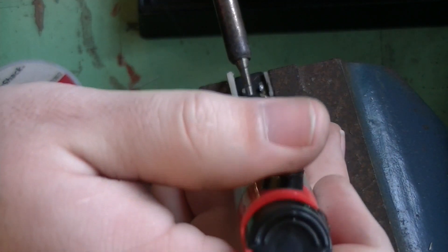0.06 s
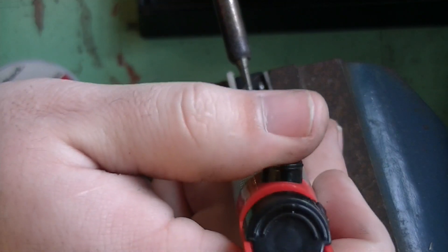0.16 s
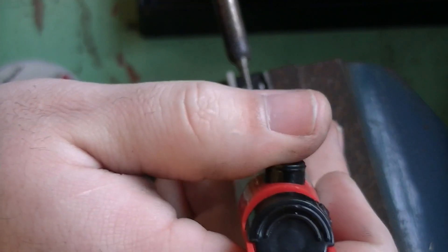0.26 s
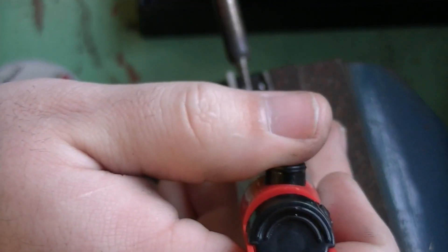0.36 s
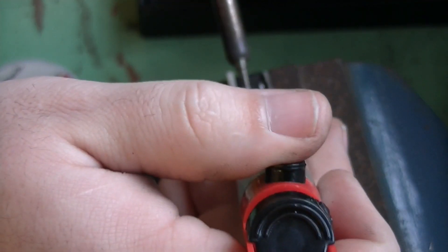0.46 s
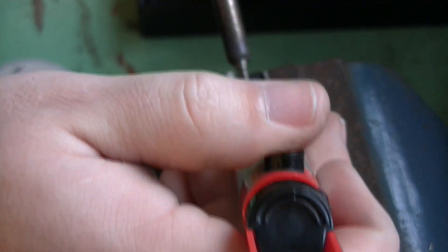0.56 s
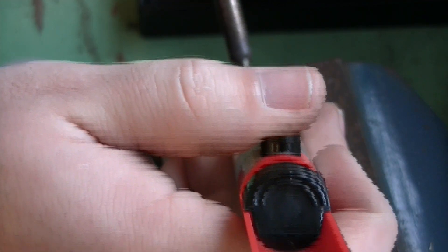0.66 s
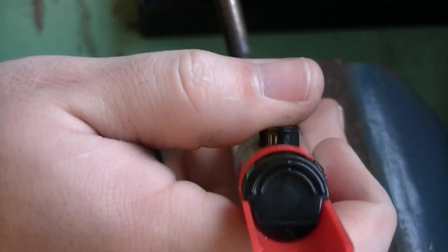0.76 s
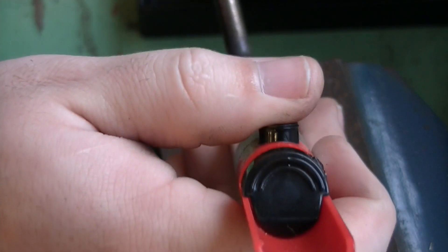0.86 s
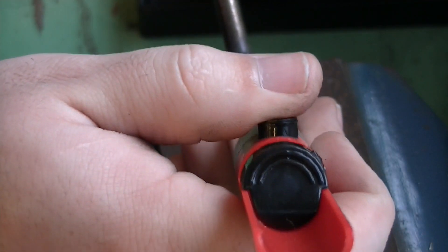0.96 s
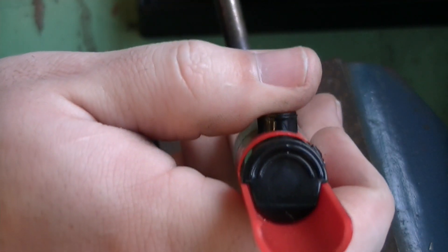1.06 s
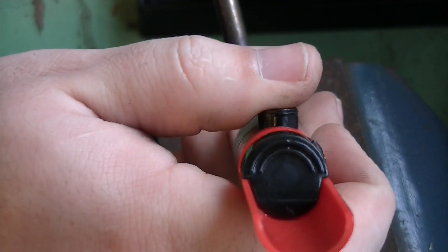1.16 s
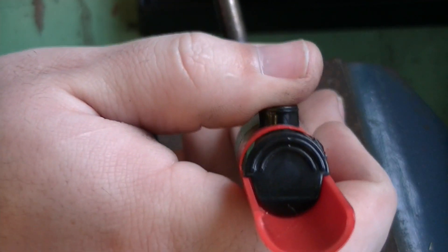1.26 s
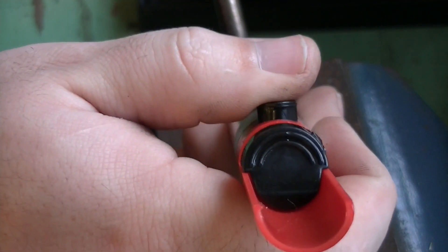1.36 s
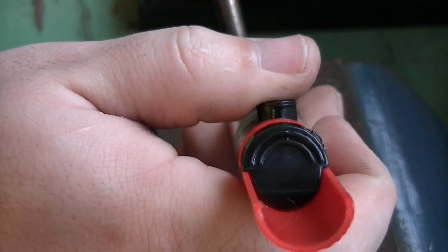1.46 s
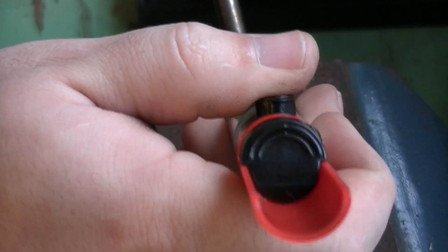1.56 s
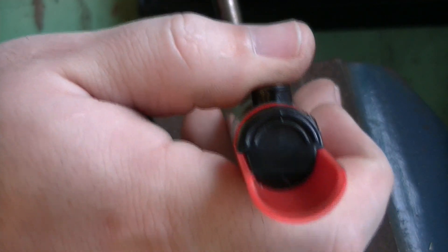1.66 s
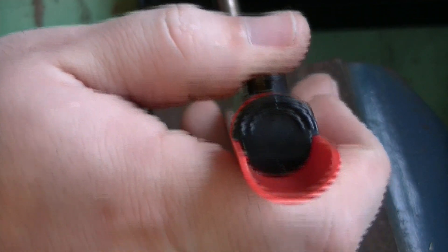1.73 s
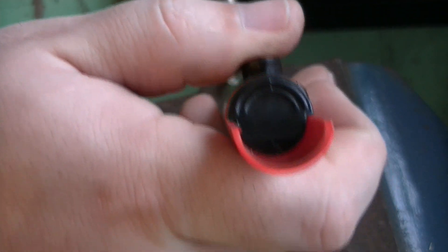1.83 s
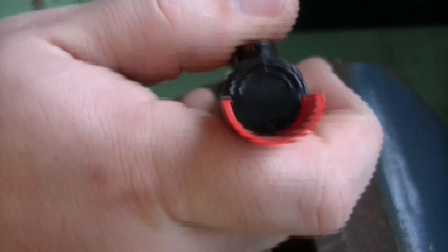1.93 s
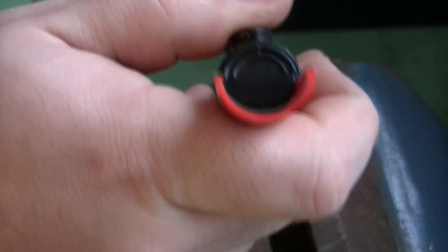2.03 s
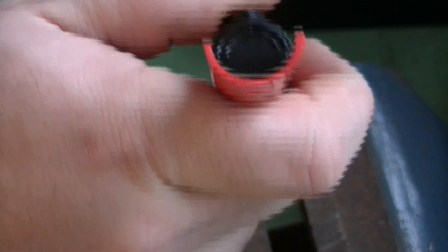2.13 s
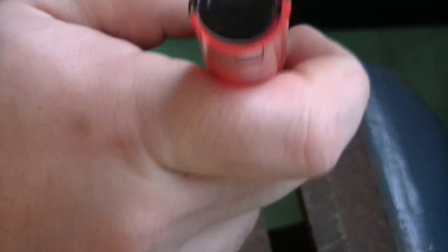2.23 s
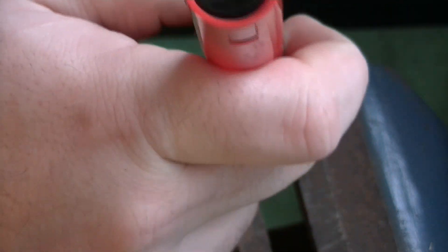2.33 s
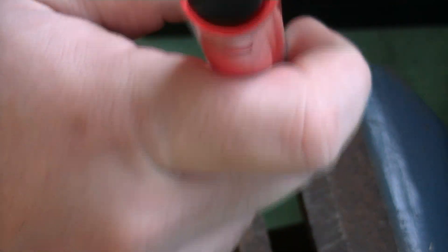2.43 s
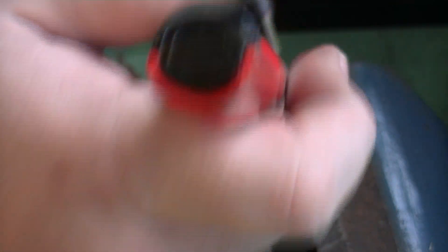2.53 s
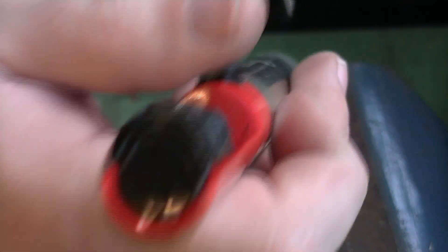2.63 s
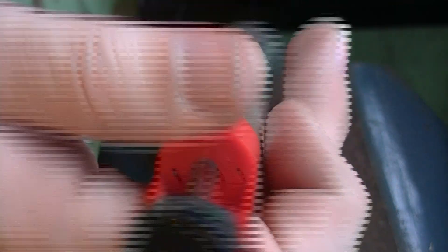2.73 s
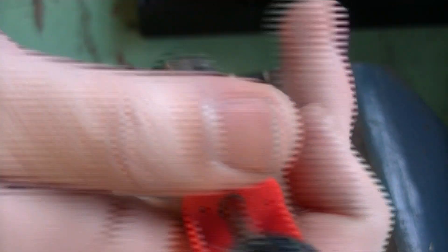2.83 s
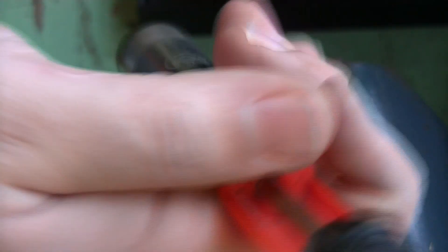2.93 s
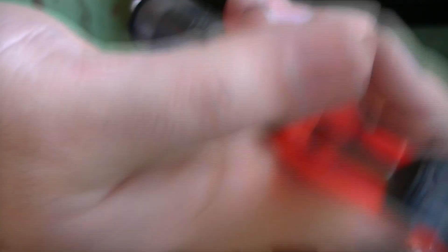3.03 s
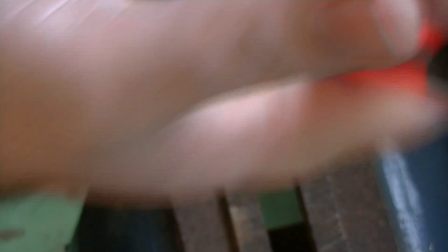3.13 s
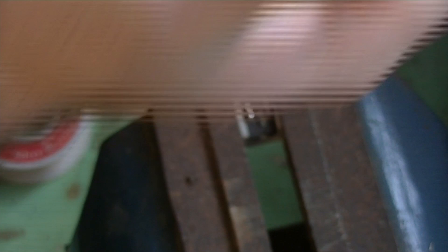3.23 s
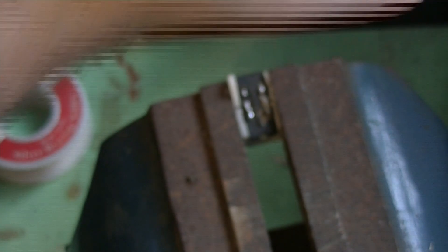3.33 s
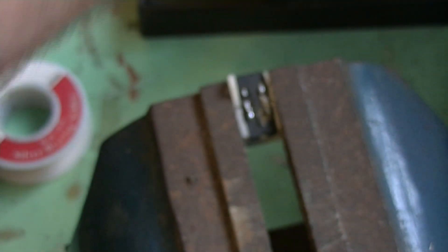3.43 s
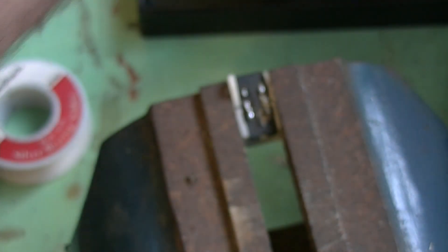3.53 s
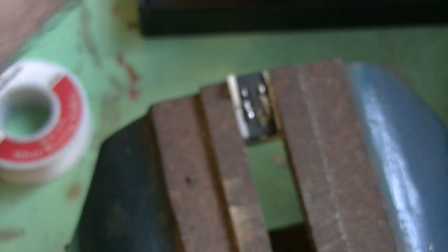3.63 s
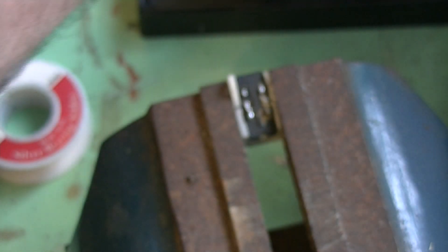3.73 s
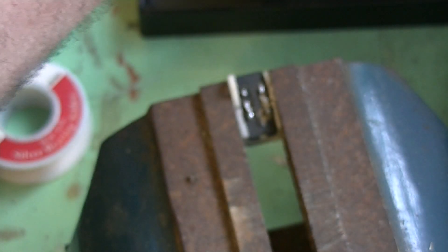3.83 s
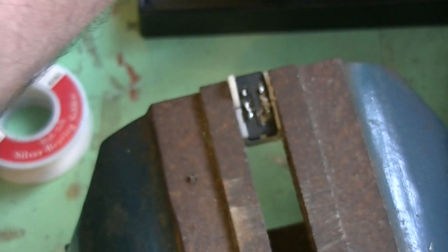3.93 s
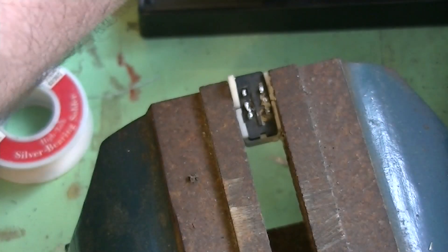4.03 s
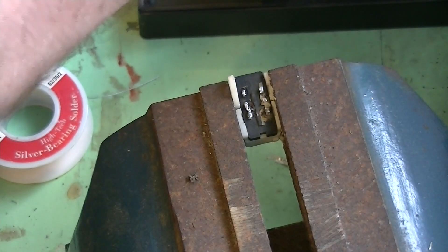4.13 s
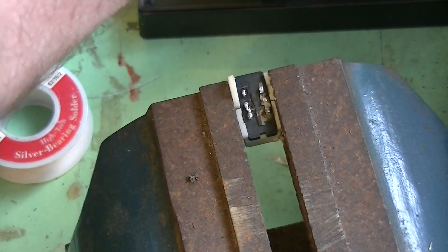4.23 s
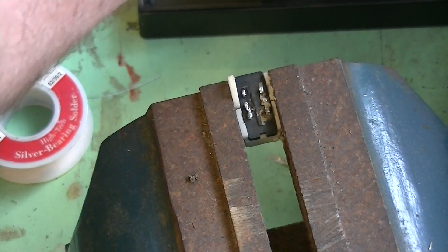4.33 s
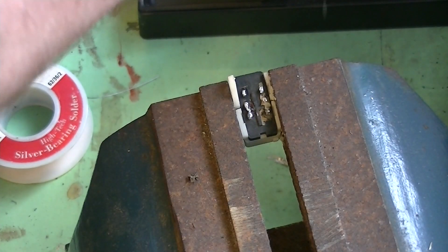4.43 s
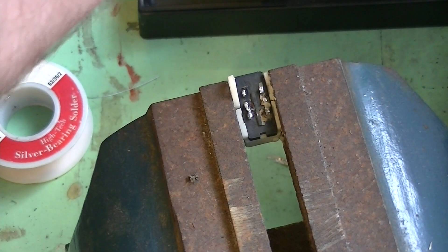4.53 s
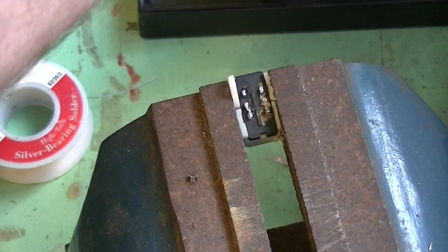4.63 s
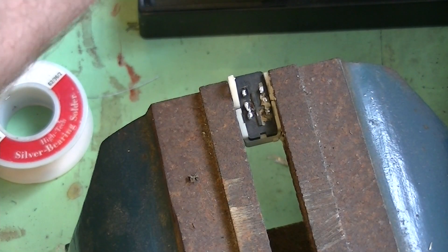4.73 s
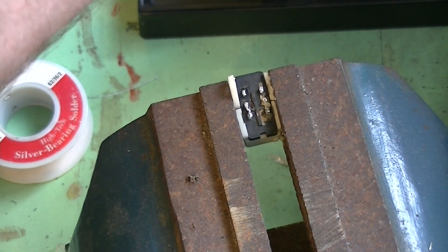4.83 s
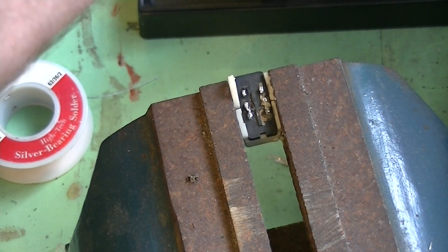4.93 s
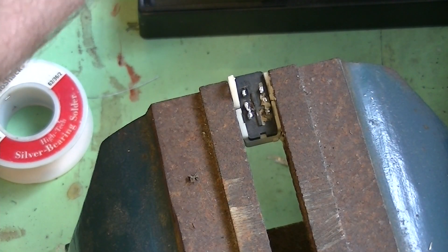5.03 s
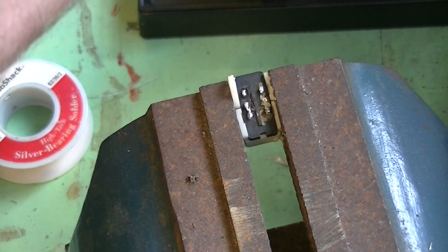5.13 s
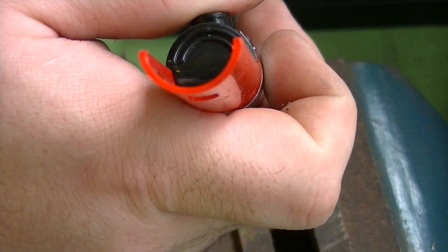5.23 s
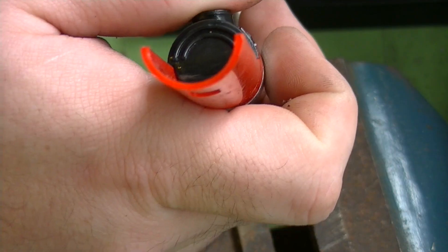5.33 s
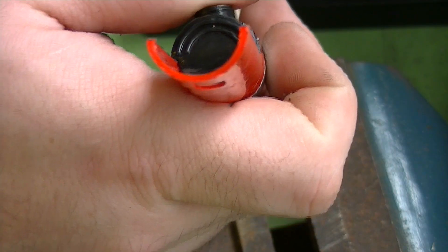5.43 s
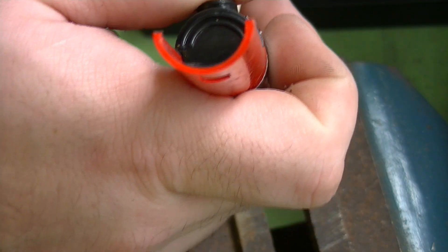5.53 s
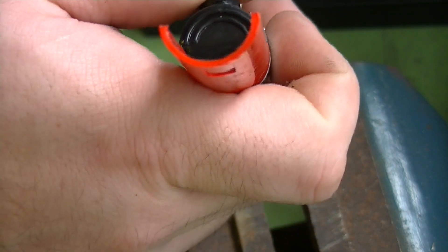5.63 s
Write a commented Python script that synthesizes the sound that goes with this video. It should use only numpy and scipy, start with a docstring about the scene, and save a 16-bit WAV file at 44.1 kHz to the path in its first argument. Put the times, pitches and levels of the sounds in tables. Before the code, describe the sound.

A low machine hum fills a small workshop, with an occasional faint squeak further off. About two seconds in, a spring-loaded solder sucker snaps sharply close to the microphone, leaving a brief rattle. Fingers slide softly on it, then it is pushed down until the latch clicks loudly. Its loose plunger is shaken up and down, each quick stroke a hissing rub ending in a knock that rings the plastic barrel and spring.

```python
"""A spring-loaded solder sucker snaps close by in a small workshop: rod and end cap ring, a rattle follows.
It is cocked again until its latch clicks, then its loose plunger is shaken up and down, the seal rubbing
and hissing and each stroke ending in a knock that rings the plastic barrel and the spring. Two machines
hum over the room noise, something further off squeaks now and then, and two thin whistles glide by."""
import sys
import numpy as np
from scipy import signal
from scipy.io import wavfile
from scipy.ndimage import uniform_filter1d

SR = 44100
rng = np.random.default_rng(int(sys.argv[2]) if len(sys.argv) > 2 else 0)


def generate_wav(signal):
    """Clip the signal to [-1, 1] and save it as 16-bit WAV at the path in sys.argv[1]."""
    frames = np.transpose(np.atleast_2d(signal))
    scaled = np.clip(frames, -1, 1) * 32767
    pcm = np.round(scaled).astype(np.int16)
    wavfile.write(sys.argv[1], SR, pcm)


N = 250929
TIME = np.arange(N) / SR


def amp(db):
    return 10 ** (np.asarray(db) / 20)


def unit_rms(x):
    return x / np.sqrt(np.mean(x ** 2) + 1e-20)


def curve_at(points, hz):
    f, value = np.transpose(points)
    return np.interp(np.log(hz + 1), np.log(f + 1), value)


def ringing(modes):
    """Impulse response of dying modes (f/Hz, level/dB, t60/s), energy 1."""
    t = np.arange(SR // 2) / SR
    ring = sum((-1) ** k * amp(db - 60 * t / t60) * np.sin(2 * np.pi * hz * t)
               for k, (hz, db, t60) in enumerate(modes))
    return ring / np.linalg.norm(ring)


def resonant(peaks):
    """Impulse response of peaks (f/Hz, width/Hz, level/dB): a wide one starts higher and dies fast."""
    return ringing([(hz, db + 20 * np.log10(width), np.log(1000) / np.pi / width)
                    for hz, width, db in peaks])


def excite(drive, ring):
    return signal.fftconvolve(drive, ring)[:N]


def noise(shape_db, size, likeness=lambda hz: 1):
    """Stereo noise coloured by shape_db(hz, t); a likeness of 1 makes left and right the same."""
    hz = np.fft.rfftfreq(size, 1 / SR)[:, None]
    t = np.arange(N * 4 // size + 5) * size / 4 / SR
    a, b, c, d = rng.standard_normal((len(t), len(hz), 4)).T
    like = np.clip(likeness(hz), 0, 1)
    left = a + 1j * b
    right = like * left + np.sqrt(1 - like ** 2) * (c + 1j * d)
    spectra = np.array([left, right]) * amp(shape_db(hz, t))
    return signal.istft(spectra, nperseg=size, noverlap=size * 3 // 4)[1][:, :N]


def wander(top_hz):
    """Slow random curve of rms 1."""
    rates = np.geomspace(.2, top_hz, num=16)
    return unit_rms(sum(np.sin(2 * np.pi * (hz * TIME + rng.random())) / np.sqrt(hz) for hz in rates))


# colour of the room tone: f/Hz, level/dB
ROOM_COLOUR = [(15, -40.5), (25, -28.5), (43, -16), (66, -4.5), (84, -35), (117, -3.5), (190, -15),
               (317, -15.5), (344, -25.5), (373, -12.5), (405, -19), (818, -20), (1130, -23.5),
               (1440, -24.5), (16000, -50)]
# its stereo image: f/Hz, left-right likeness/0..1
ROOM_LIKENESS = [(60, 1.0), (180, 0.95), (550, 0.89), (1650, 0.87), (4970, 1), (15000, 1)]
def room_tone():
    """A dark, gently drifting bed of noise, levelled by its part above 150 Hz."""
    bed = noise(lambda hz, t: curve_at(ROOM_COLOUR, hz), 2048, lambda hz: curve_at(ROOM_LIKENESS, hz))
    upper = signal.sosfilt(signal.butter(4, 150, "high", fs=SR, output="sos"), bed[0])
    return amp(-50.5 + .6 * wander(2.26)) * bed / np.std(upper)


def machine_hum():
    """Two motors a little apart in speed beat slowly; overtones waver; late on, the level dips briefly."""
    beat = np.sin(np.pi * (TIME - .72) / .765)  # a null every .765 s
    motors = amp(-45) * (beat * np.sin(2 * np.pi * 59.2 * TIME) + .189 * np.cos(2 * np.pi * 58.5 * TIME))
    turns = np.cumsum(58 + .5 * wander(2.7)) / SR
    overtones = sum(amp(db + .75 * wander(5.6)) * np.sin(2 * np.pi * k * turns)
                    for k, db in [(2, -46), (5, -63.5), (6, -63)])
    dip = amp(np.interp(TIME, [5.46, 5.52, 5.6, 5.69], [.5, -12, -7, 2]))
    return dip * (motors + overtones) * amp([[-.4], [.4]])


def slip_tone(path, partials, waver, shake_db):
    """A slipping contact sings, fluttering; its loudest partial follows path (t/s, f/Hz, level/dB)."""
    times, hz, db = np.transpose(path)
    lead = max(partials, key=lambda partial: partial[1])[0]
    span = slice(round(times[0] * SR), round(times[-1] * SR))
    t = TIME[span]
    flutter, shake = unit_rms(uniform_filter1d(rng.standard_normal((2, SR // 2)), 200))[:, :len(t)]
    turns = np.cumsum(np.interp(t, times, hz) * (1 + waver * flutter)) / SR / lead
    envelope = np.sqrt(2) * amp(np.interp(t, times, db) + shake_db * shake)
    out = np.zeros(N)
    out[span] = sum(amp(partial_db) * np.sin(2 * np.pi * k * turns) for k, partial_db in partials)
    out[span] *= envelope * signal.windows.tukey(len(t), .1)
    return out


# squeak cues: t/s, length/s, strongest partial f/Hz, crest level/dB
SQUEAKS = [(0.189, 0.23, 3400, -61), (1.785, 0.31, 3457, -53.5), (2.878, .24, 3274, -59)]
# squeak timbre: multiple of the slip rate, level/dB
SQUEAK_PARTIALS = [(3.74, -13), (4, -1.5), (5, -19), (6, -15), (7, -20)]
def squeaks():
    """Something turning further off: each squeak swells, then fades, its pitch sagging throughout."""
    rise, sag, fade_db = .22, .045, 13  # rise: share of the length; sag: share of the pitch
    out = np.zeros(N)
    for start, length, hz, db in SQUEAKS:
        path = [(start, hz, db - fade_db), (start + rise * length, hz * (1 - rise * sag), db),
                (start + length, hz * (1 - sag), db - fade_db)]
        out += slip_tone(path, SQUEAK_PARTIALS, waver=.004, shake_db=4.7)
    return out


def swish(start, stop, hz, width, db):
    """Sliding friction: one broad band of noise, catching and slipping as it goes."""
    length = round((stop - start) * SR)
    band = signal.butter(2, [hz - width / 2, hz + width / 2], "band", fs=SR, output="sos")
    grit, catch = rng.standard_normal((2, SR // 2))[:, :length]
    catch_db = 1.85 * unit_rms(uniform_filter1d(catch, 500))
    envelope = amp(db + catch_db) * signal.windows.tukey(length, .2)
    out = np.zeros(N)
    out[round(start * SR):][:length] = envelope * unit_rms(signal.sosfilt(band, grit))
    return out


# handling cues: start t/s, stop t/s, f/Hz, width/Hz, level/dB
FINGER_SLIDES = [(.47, 0.528, 7200, 1500, -73), (2.726, 2.782, 7100, 710, -66.5),
                 (2.78, 2.792, 2200, 412, -57.5), (2.853, 3.174, 4760, 3000, -61),
                 (3.279, 3.328, 9900, 3000, -65)]
def finger_slides():
    """Fingers slide briefly on the pump."""
    return sum(swish(*cue) for cue in FINGER_SLIDES)


# the spring's mode clusters, two tight enough to sing: f/Hz, width/Hz, level/dB, t60/s
SPRING_CLUSTERS = [(2846, 300, -8, .07), (3330, 40, -13, .4), (3700, 600, -2, .22), (4300, 450, -1, .24),
                   (4300, 50, -11, 0.41), (5330, 550, -10, 0.14), (6560, 800, -16, 0.24),
                   (8580, 1100, -12, 0.073)]
def spring_ring():
    """Eighty modes of chance pitch and phase a cluster: the wider the cluster, the less of a tone."""
    t, ring = np.arange(SR // 2) / SR, 0
    for hz, width, db, t60 in SPRING_CLUSTERS:
        pitches = hz + width / 2 * rng.standard_normal((80, 1))
        modes = np.sin(2 * np.pi * (pitches * t + rng.random((80, 1))))
        ring = ring + amp(db - 60 * t / t60) * modes.sum(0)
    return ring / np.linalg.norm(ring)


# the pump's resonances: f/Hz, width/Hz, level/dB
BARREL = [(2820, 187, 4.5), (3740, 238, 1), (4405, 320, -2.5), (5200, 260, -7), (6720, 490, -10),
          (7900, 780, -10.5), (9900, 1200, -16.5), (11600, 1700, -26), (14200, 900, -24)]  # plastic tube
TICK = [(7560, 990, -9.5), (10250, 1200, 4.5), (13900, 670, -12)]  # hard contact
CLACK = [(1375, 290, -13.5), (2000, 1600, -6.5), (3100, 800, -23.5), (4070, 1700, 1), (5500, 670, -2)]  # latch and collar
THUD = [(275, 80, -6), (434, 90, 3), (600, 160, -2), (970, 340, -7), (1735, 190, -2)]  # hand and bench
END_CAP = [(1430, 510, -3.5), (2200, 560, -0.5), (3000, 410, 2), (4940, 920, -5.5)]
# mix per kind of contact: level/dB of barrel, spring, tick, clack, thud, end cap; contact length/ms
CONTACTS = {"latch": (3, -6.5, -7, -6.7, -37.5, -20, 0.1), "hard": (-17, -26, -5, -2, -12.5, -18, 1),
            "soft": (-23, -27.5, -15.5, 4.5, -10.5, -30, 2), "jolt": (-0.4, -19.5, -10, -10, -8, -19, 1.3),
            "tap": (-16, -30, -28.5, -16, -17, -5.4, 3.7)}
def strike(hits, springs, grip):
    """Each hit is a short chatter of contact that sets six parts of the pump ringing."""
    drive, t = np.zeros((6, N + 1024)), TIME[:1024]
    for start, db, contact in hits:
        *parts_db, contact_ms = CONTACTS[contact]
        push = (rng.standard_normal(1024) + 7 * (t == 0)) * np.exp(-(t * 1000 / contact_ms) ** 2)
        push /= np.linalg.norm(push)
        drive[:, round(start * SR):][:, :1024] += amp(db) * amp(parts_db)[:, None] * push
    barrel, spring, tick, clack, thud, cap = drive
    thud = uniform_filter1d(abs(thud), size=6)  # the low parts feel one soft push
    # the spring lies differently from stroke to stroke
    lie = np.searchsorted([row[0] for row in STROKES], np.arange(N + 1024) / SR) % len(springs)
    zing = sum(excite(spring * (lie == k), ring / abs(ring).max()) for k, ring in enumerate(springs))
    return grip * zing + ring_parts([barrel, tick, clack, thud, cap], [BARREL, TICK, CLACK, THUD, END_CAP])


def ring_parts(drives, parts):
    """Each drive rings its own part, whose impulse response peaks at 1."""
    return sum(excite(drive, ring / abs(ring).max()) for drive, ring in zip(drives, map(resonant, parts)))


# single hits on the pump: t/s, level/dB, contact
BLOWS = [(2.2493, -14, "soft"), (3.493, -25.5, "tap"), (3.513, -25.5, "tap"), (3.533, -30, "tap"),
         (3.563, -36, "tap"), (3.7349, -1.5, "latch"), (3.736, -25.5, "hard"), (3.7433, -28.5, "hard"),
         (4.391, -55, "latch"), (4.566, -41.5, "latch"), (4.698, -56, "latch"), (5.5065, -26.5, "tap")]
def blows(springs, grip):
    """A soft bump leads into the snap; later come light taps and the loud click of the latch."""
    return strike(BLOWS, springs, grip)


# bounces on the end cap: t/s, level/dB
BOUNCES = [(2.2643, 0), (2.269, -7), (2.272, -15)]
def snap():
    """The plunger slams home: four hard contacts chatter on the rod, then it bounces on the end cap."""
    slam_s, gap_s, fall_db = 2.2512, .00117, 3
    on_rod, on_cap = (0, -10, -13), (-12, 0, -8)  # level/dB of rod, end cap, tick
    rod = KEEP_ROD
    hits = [(slam_s + k * gap_s, -k * fall_db, on_rod) for k in range(4)]
    hits += [(start, db, on_cap) for start, db in BOUNCES]
    drive = np.zeros((3, N))
    for start, db, parts_db in hits:
        push = np.eye(1, 8) + .2 * rng.standard_normal(8)  # a slightly rough impulse
        drive[:, round(start * SR):][:, :8] += amp(db) * amp(parts_db)[:, None] * push
    return ring_parts(drive, [rod, END_CAP, TICK])


# colour of the clatter: f/Hz, level/dB
RATTLE_COLOUR = [(76, -51), (130, -36), (253, -10.5), (335, -10.5), (453, -7), (522, -13.5), (1080, -9),
                 (1270, -6), (1490, -17.5), (1610, -7.5), (5080, -2.5), (10300, -17.5), (16000, -45.5)]
# tones ringing in it: f/Hz, level/dB, t60/s
RATTLE_MODES = [(252, -5, 0.2), (1080, -5, .2), (1490, -2, .22), (1718, -5, .2), (2171, -8, .2),
                (2548, -6, .2), (2780, -2, 0.15), (3290, -4, .1)]
def rattle():
    """After the snap a dense clatter swells and fades, quickly losing treble."""
    start_s, peak_s, dulling_s = 2.255, 2.301, .025
    loss_db_per_octave, fall_db_per_s = 5.5, 111

    def colour_db(hz, t):
        dulled = np.clip((t - start_s) / dulling_s, 0, 1)
        return curve_at(RATTLE_COLOUR, hz) - loss_db_per_octave * dulled * np.log2(hz / 3000 + 1)

    clatter = noise(colour_db, size=256)
    tones = excite(rng.standard_normal(N), ringing(RATTLE_MODES))
    swell_db = np.interp(TIME, [start_s, peak_s], [-22.5, -19.5], left=-220)
    envelope = amp(swell_db - fall_db_per_s * np.maximum(TIME - peak_s, 0))
    return envelope * (unit_rms(clatter) + amp(-8) * unit_rms(tones))


# one path per whistle: t/s, f/Hz, level/dB
WHISTLES = [
    [(2.82, 3480, -57), (2.846, 3580, -60), (2.888, 4430, -61), (2.94, 4550, -70), (2.98, 5170, -71),
     (3.03, 5100, -70)],
    [(3.13, 4460, -64), (3.205, 3925, -57), (3.262, 3890, -62.5), (3.29, 3650, -65.5)],
]
def whistles():
    """Two thin, faint whistles, one gliding up and one down."""
    return sum(slip_tone(path, [(1, 0)], waver=.002, shake_db=1.7) for path in WHISTLES)


# friction bands of the cocking push: f/Hz, width/Hz, level/dB
COCKING_BANDS = [(2200, 1520, -50.5), (4720, 2000, -54), (7500, 3000, -60.5), (11800, 3500, -59)]
def cocking(start_s, stop_s):
    """The slow push that cocks the plunger stirs several bands at once."""
    return sum(swish(start_s, stop_s, *band) for band in COCKING_BANDS)


# plunger cues: start t/s, knock t/s, level/dB of rub at start, of rub at end and of knock, motion
STROKES = [(3.738, 3.78, -34.5, -53, -20.5, "recoil"), (3.929, 3.951, -37, -21.5, -11, "drop"),
           (4.158, 4.189, -32.5, -36, -20.5, "lift"), (4.3, 4.321, -34.5, -23, -11, "drop"),
           (4.452, 4.482, -33, -36.5, -25, "lift"), (4.584, 4.607, -37.5, -23, -12, "drop"),
           (4.717, 4.745, -29, -39.5, -22.5, "lift"), (4.833, 4.854, -44, -21, -11, "drop"),
           (4.955, 4.984, -27.5, -37, -23.5, "lift"), (5.1, 5.133, -34.5, -39, -30, "lift"),
           (5.164, 5.193, -39.5, -33, -20.5, "ease")]
# per motion: spring send/dB, hiss over mean rub/dB, jolt over first rub/dB, gap before knock/s, contact
MOTIONS = {"ease": (-16, -5, -23, 0.0034, "soft"), "drop": (0, -6.5, 5, 0.0059, "hard"),
           "lift": (-2, -6, 5.1, 0.0028, "soft"), "recoil": (5.9, 7, -21.5, .001, "soft")}
def plunger_rub(springs):
    """Stick-slip grains of the seal rub barrel and spring; air hisses past; all die just after the stop."""
    rub, air = np.zeros((2, N))
    sends = np.zeros((len(springs), N))
    for k, (start, knock, start_db, stop_db, _, motion) in enumerate(STROKES):
        send_db, hiss_db, _, gap_s, _ = MOTIONS[motion]
        stop = max(knock - gap_s, start + .002)
        span = slice(round(start * SR), round((stop + .1) * SR))
        t = TIME[span]
        gate = np.clip((t - start) / .003, 0, 1) * amp(-900 * np.maximum(t - stop, 0))
        force = gate * amp(np.interp(t, [start, stop], [start_db, stop_db]))
        rub[span] += force
        sends[k % len(springs), span] += force * amp(send_db)
        air[span] += gate * amp((start_db + stop_db) / 2 + hiss_db)
    grains = unit_rms(rng.standard_normal(N) * (rng.random(N) < 9000 / SR))
    damped = springs * amp(-700 * TIME[:len(springs[0])])  # the sliding seal damps the ring
    zing = sum(excite(send * grains, ring / np.linalg.norm(ring)) for send, ring in zip(sends, damped))
    return excite(rub * grains, resonant(BARREL)) + zing + air * seal_hiss()


def plunger_knocks(springs, grip):
    """Each stroke jolts loose at its start and knocks at its end."""
    jolts = [(start, db + MOTIONS[motion][2], "jolt") for start, _, db, _, _, motion in STROKES]
    knocks = [(knock, db, MOTIONS[motion][-1]) for _, knock, _, _, db, motion in STROKES]
    return strike(jolts + knocks, springs, grip)


# colour of the escaping air: f/Hz, level/dB
HISS_COLOUR = [(530, -31), (900, -8.5), (2190, -8), (2730, -24), (3910, -6.5), (5820, -10.5), (14400, -31),
               (16000, -35.5)]
def seal_hiss():
    """Air squeezes past the seal."""
    return unit_rms(noise(lambda hz, t: curve_at(HISS_COLOUR, hz), size=512)[0])


# reverb decay: f/Hz, t60/s
ROOM_DECAY = [(300, 1), (1500, 0.49), (4000, 0.52), (9000, 0.34), (15000, 0.15)]
def workshop_reverb(send):
    """Sparse reflections of random sign, each band dying at its own speed."""
    taps = np.zeros((2, SR))
    slots = np.arange(200, SR - 20, 20)
    arrivals = slots + rng.integers(0, 20, (2, len(slots)))
    np.put_along_axis(taps, arrivals, rng.choice([-1., 1.], arrivals.shape), 1)
    taps[1] = .68 * taps[0] + .087 * taps[1]  # a narrow stereo image
    hz, t, spectra = signal.stft(taps, SR, nperseg=256)
    tail = signal.istft(spectra * amp(-60 * t / curve_at(ROOM_DECAY, hz)[:, None]), SR, nperseg=256)[1]
    return signal.fftconvolve(send[None], tail / np.linalg.norm(tail[0]), axes=1)[:, :N]


def scene():
    """The pump up close and slightly right, squeaks and whistles behind, over room tone and hum."""
    springs = [spring_ring() for _ in range(3)]
    grip = amp(-3006 * np.maximum(TIME - 5.246, 0))  # the hand closes and stills the spring
    pump = grip * plunger_rub(springs) + finger_slides() + cocking(start_s=3.485, stop_s=3.74)
    pump += plunger_knocks(springs, grip) + blows(springs, grip) + snap()
    far = squeaks() + whistles()
    direct = (pump + rattle()) * amp([[-.5], [.5]]) + far
    return direct + workshop_reverb(amp(-13.5) * pump + amp(-22) * far) + room_tone() + machine_hum()


def record(dry):
    """Low cut at 42 Hz, a hard clip on the loudest hits, high cut at 16.1 kHz."""
    thinned = signal.sosfilt(signal.butter(2, 42, "high", fs=SR, output="sos"), dry)
    clipped = np.clip(thinned, -.97, .97)
    high_cut = signal.firwin(511, 16100, window=("kaiser", 9), fs=SR)
    return signal.oaconvolve(clipped, high_cut[None], "same")


# the rod's resonances: f/Hz, width/Hz, level/dB
KEEP_ROD = [(3243, 444, -1), (4300, 430, 2.5), (5700, 770, -9)]

dry = scene()
out = record(dry)
generate_wav(out)
```